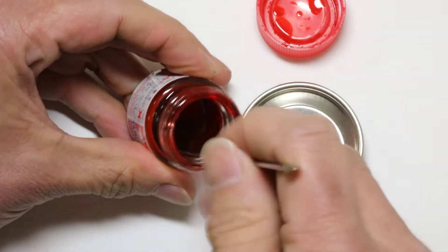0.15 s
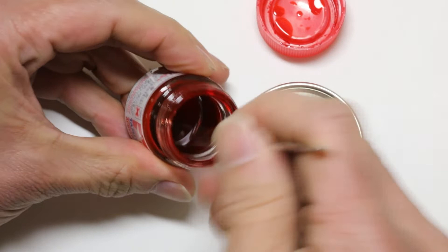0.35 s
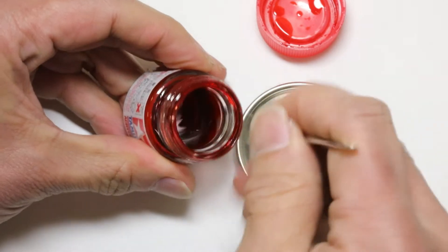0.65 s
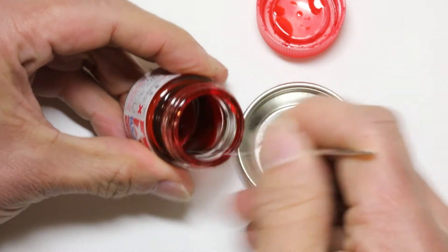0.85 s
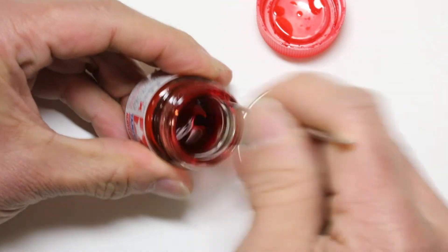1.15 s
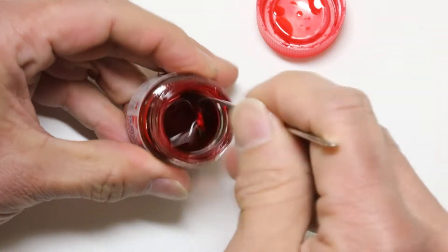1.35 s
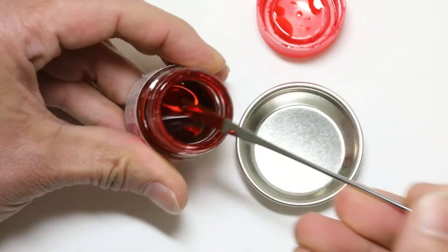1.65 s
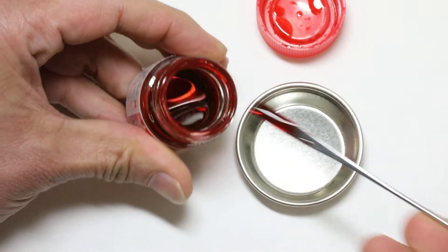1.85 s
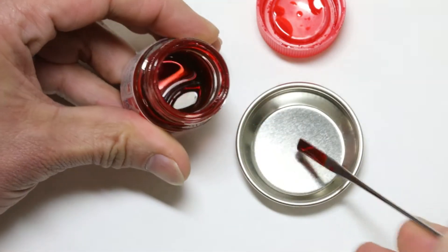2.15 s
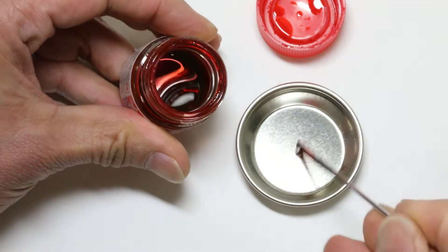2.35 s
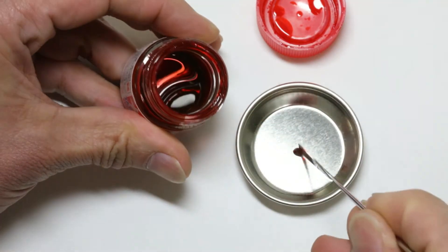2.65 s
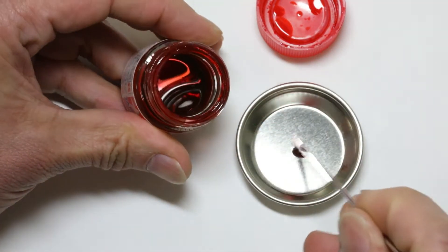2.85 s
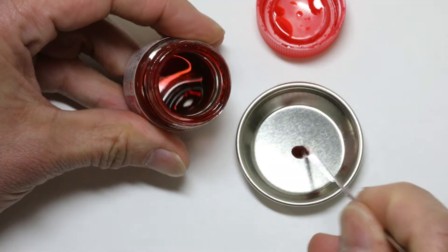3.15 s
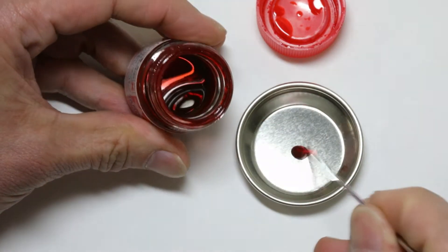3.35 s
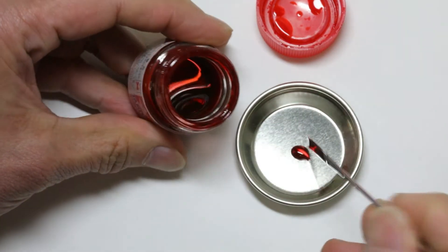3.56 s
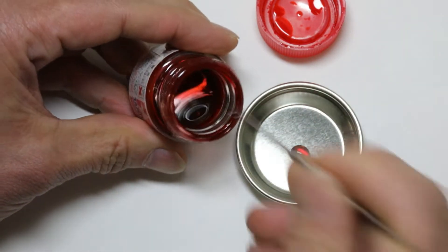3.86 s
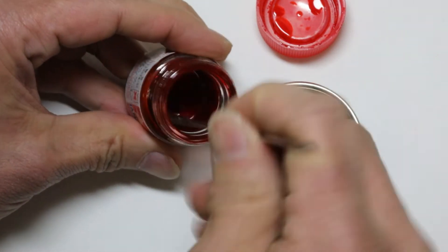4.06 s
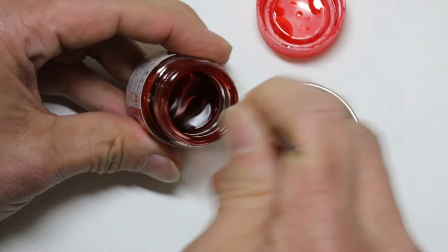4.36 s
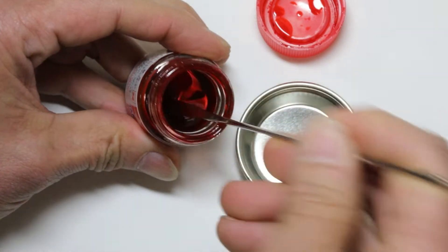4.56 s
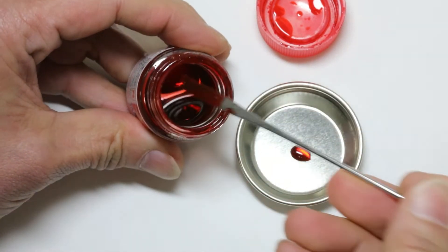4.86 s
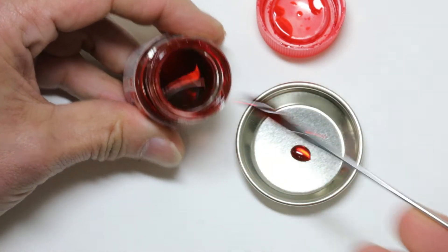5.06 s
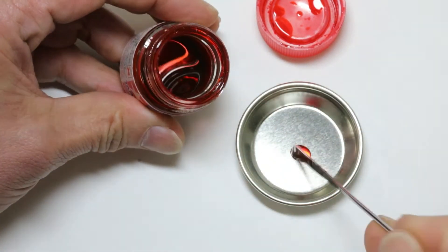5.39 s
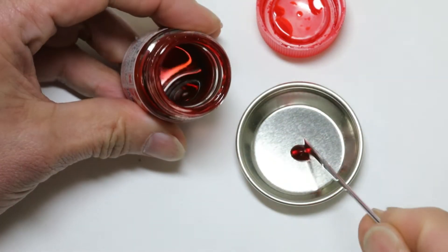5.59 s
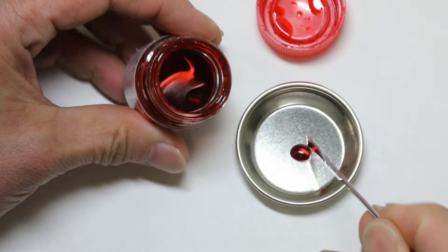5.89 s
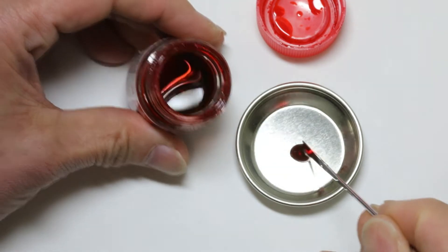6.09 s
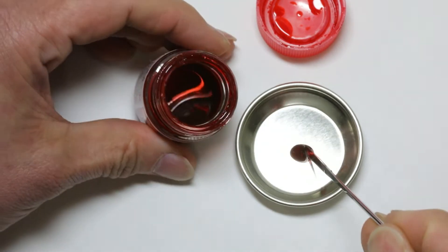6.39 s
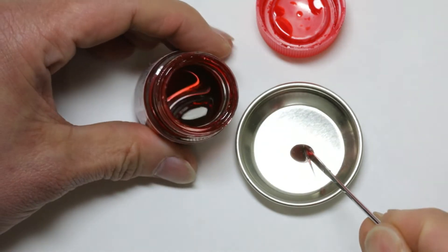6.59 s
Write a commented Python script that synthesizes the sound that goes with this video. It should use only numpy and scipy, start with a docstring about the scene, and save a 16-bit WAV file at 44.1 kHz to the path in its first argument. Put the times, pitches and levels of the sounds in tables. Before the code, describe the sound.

From the start until about 1.7 seconds, a thin metal rod stirs paint in a small hand-held glass jar. It makes light, irregular, damped ticks against the glass and soft scrapes on the bottom, over a very faint table rumble. After a short pause, from about 2.3 to 3.5 seconds, the rod taps a shallow metal dish about eight times, roughly six taps a second. These clinks are bright, clearly louder than the stirring, and ring only briefly. From 4.0 to 4.7 seconds the rod ticks and scrapes in the jar again. Between 5.4 and 6.2 seconds come about five more taps on the dish, with a faint hiss as the wet tip slides over the metal near the end. The sound is close and nearly mono, at a worktable in a small room with a low steady rush throughout.

```python
"""A worktable in a small room with a low steady rush; close, nearly mono microphone.
A thin metal rod stirs paint in a small hand-held glass jar: it ticks against the wall, ringing the
damped glass, and scrapes the bottom. It then taps drops off into a shallow metal dish, where rod
and dish ring together briefly. It stirs again and taps again."""
import sys
import numpy as np
from scipy import signal
from scipy.fft import rfft, irfft
from scipy.io import wavfile

SR = 44100
rng = np.random.default_rng(int(sys.argv[2]) if len(sys.argv) > 2 else 0)


def inscribe(sig):
    """Save sig as 16-bit PCM at rate SR to the path in sys.argv[1].

    A 1-D sig is mono; a 2-D sig holds one channel per row.
    Samples are clipped to [-1, 1] before scaling.
    """
    pcm = np.round(np.clip(np.atleast_2d(sig).T, -1, 1) * 32767)
    wavfile.write(sys.argv[1], SR, pcm.astype(np.int16))


N = 296793
TIME = np.arange(N) / SR
FREQ = np.arange(N // 2 + 1) * SR / N

# jar, damped by hand and paint: (frequency [Hz], level [dB], t60 [s])
JAR_MODES = [(440, -23, 0.032), (1515, 1.5, 0.0039), (1864, 5, 0.028), (2303, 0, 0.0073), (2377, 1.5, 0.01),
             (2886, -10.5, 0.02), (3070, -8, 0.0071), (3734, -15, 0.029), (4170, -11, 0.013),
             (4740, -16, 0.025), (5110, -13, 0.013), (5520, -12, 0.012), (6680, -1.5, 0.0047),
             (7000, -3, 0.0076), (7620, -5, 0.015), (7920, -7.5, 0.0091), (8800, -9, 0.0084),
             (11400, -4.5, 0.013), (12380, -5, 0.012), (13000, -5.5, 0.023), (15200, -15, 0.0068)]
# spells of stirring: (start [s], end [s], table rumble [dB], jar air ring [dB], graze rate [1/s])
STIRS = [(0, 1.68, -63.5, -8, 6), (4.08, 4.7, -63, -3, 4.1)]


def jar_ticks(grate_db=0.5, grate_s=0.004, detune=0.008, share_spread_db=1.5):
    """Each tick meets the wall at another spot, so the modes share it differently; the tip grates."""
    # (time [s], level [dB], hardness [0 = tip cushioned by paint, 1 = bare shaft on the rim])
    ticks = [(.029,-35.5,0.44), (0.0544,-44.5,.75), (0.1298,-35,0.97), (0.1397,-32.5,0.13),
             (.2108,-33,0.18), (.3082,-37.5,1), (0.3185,-33,0.14), (0.3895,-30,0.24), (0.408,-40,.62),
             (0.4787,-45.5,0.97), (.502,-25,0.083), (.5753,-36.5,.08), (.667,-35,0.67), (.7703,-36.5,0.22),
             (0.8436,-35.5,0.91), (0.8499,-32.5,.27), (.9478,-33.5,0.31), (1.0322,-40,.52),
             (1.064,-44,0.48), (1.1502,-39,0.39), (1.236,-45.5,0.87), (1.2503,-33.5,0.19),
             (1.3412,-38.5,0.15), (1.428,-45.5,.66), (1.5694,-31,0.78), (1.583,-37,.6), (1.638,-45,.72),
             (4.0401,-34,0.52), (4.1795,-28.5,0.21), (4.2068,-41.5,0.73), (4.2348,-37.5,0.51),
             (4.3798,-39,.97), (4.443,-33,0.37), (4.5682,-36.5,0.32)]
    out = np.zeros(N)
    hz, db, t60 = np.transpose(JAR_MODES)
    spot_weight = np.minimum(hz / 6000, 1) ** 2  # the low air ring hardly depends on the spot
    for start_s, level_db, hardness in ticks + grazes():
        share, shift = rng.standard_normal((2, len(hz))) * spot_weight
        tick = ring(hz * (1 + detune * shift), db + share_spread_db * share, t60)
        grate = undb(grate_db) * noise_burst(len(tick), grate_s)
        _, _, _, stir_air_db, _ = min(STIRS, key=lambda stir: abs(start_s - stir[0]))
        # harder contact: more glass, less air
        air_db = stir_air_db + 3.5 - 3 * hardness
        glass_db = -11.5 + 21 * hardness
        top_db = -22 + 30 * hardness
        outline = [(1000, air_db - 0.5), (1450, air_db), (1950, air_db), (2400, 0), (5000, 0),
                   (6100, glass_db), (8200, glass_db), (9200, (glass_db + top_db) / 2 - 4.5),
                   (11000, top_db), (13400, top_db), (14400, top_db - 9)]
        add(out, start_s, undb(level_db) * contact(tick + grate, outline))
    return out


def grazes(level_db=-49.5, spread_db=5, hardness=0.62, max_per_stir=24):
    """The shaft brushes the rim by chance: rows of (time [s], level [dB], hardness [0-1])."""
    rows = []
    for start_s, end_s, _, _, per_s in STIRS:
        jitter, strength = rng.random((max_per_stir, 2)).T
        times_s = start_s + (np.arange(max_per_stir) + jitter) / per_s
        levels_db = level_db + spread_db * (strength - 0.5)
        rows += [(s, db, hardness) for s, db in zip(times_s, levels_db) if s < end_s]
    return rows


def dish_taps(crack_db=-32, crack_s=0.006, detune=0.015, force_floor_db=-4.5):
    """The dish lies on the table and dies fast; the rod's own pitch shifts with grip and angle."""
    # (time [s], level [dB], first rod bending mode [Hz], second [Hz])
    taps = [(2.335, -2, 2880, 7980), (2.4215, -17.5, 2800, 8150), (2.5258, 1.5, 2880, 7980),
            (2.7023, 0, 2800, 7650), (2.8684, 1.5, 3000, 8560), (3.0252, 2, 2890, 8240),
            (3.192, 0, 2800, 7500), (3.3492, 0, 2780, 7450), (3.4950, -.5, 2306, 6780),
            (5.424, -7.5, 2870, 7760), (5.5850, -3, 2800, 7900), (5.7160, -2, 2920, 8100),
            (5.8331, -0.5, 2850, 8280), (5.885, -19, 3140, 8000), (6.146, -1, 2800, 7400),
            (6.3865, -35.5, 2900, 7300)]
    # dish and rod together: (frequency [Hz], level [dB], t60 [s])
    modes = [(343, -41.5, 0.05), (488, -30, 0.021), (665, -29, 0.0067), (866, -33.5, 0.02),
             (1226, -32, 0.0084), (2288, -25, 0.013), (2833, -15.5, 0.016), (3245, -35.5, 0.03),
             (3870, -13.5, 0.0071), (4477, -6, 0.0066), (4568, -23.5, 0.049), (4638, -17.5, 0.018),
             (4760, -31, 0.03), (4937, -31, 0.04), (5066, -15.5, 0.011), (5820, -5.5, 0.0029),
             (6430, -3.5, 0.0011), (7647, -18, 0.015), (8050, -66, 0.017), (11620, -33, 0.014),
             (15400, -61, 0.012)]
    lower, upper = 6, 17  # rows of the rod's bending modes
    out = np.zeros(N)
    hz, db, t60 = np.transpose(modes)
    for start_s, level_db, *rod_hz in taps:
        # the highest modes depend most on where the tip lands
        tap_hz = hz * (1 + detune * (hz / 11000) ** 2 * rng.standard_normal(len(hz)))
        tap_hz[[lower, upper]] = rod_hz
        # a longer free end rings lower and louder, knocks harder and lands further off centre
        pitch_ratio = hz[upper] / tap_hz[upper]
        drop_oct = np.log2(pitch_ratio)
        tap_db = db.copy()
        tap_db[upper] += 44 * np.log(pitch_ratio)
        tap = ring(tap_hz, tap_db, t60)
        crack = undb(crack_db) * noise_burst(len(tap), crack_s)
        force_db = max(level_db, force_floor_db)  # a light tap hardly drives the table or bends the rod
        knock_db = -1 + 32.5 * drop_oct + 1.77 * force_db
        rod_db = 19 * drop_oct + 0.7 * force_db
        centre_db = -1.4 - 24 * drop_oct  # a central tap favours the lower main dish mode
        treble_db = -3 + 23 * drop_oct
        outline = [(1200, knock_db), (2200, rod_db), (3200, rod_db),
                   (3750, centre_db), (4250, centre_db), (4750, -centre_db / 2),
                   (6200, treble_db), (11500, treble_db), (14000, treble_db - 11)]
        add(out, start_s, undb(level_db) * contact(tap + crack, outline))
    return out


def rod_pings():
    """The rod catches an edge and sings briefly on one mode."""
    # (time [s], frequency [Hz], level [dB], t60 [s])
    pings = [(2.58, 4120, -30, 0.027), (4.1806, 6550, -23, 0.023), (4.3811, 6470, -23, 0.0076)]
    out = np.zeros(N)
    for start_s, *mode in pings:
        add(out, start_s, ring(*np.transpose([mode])))
    return out


def jar_scrapes():
    """The tip drags through the paint and its slips ring the jar softly."""
    # (middle [s], half length [s], level [dB], treble [dB])
    scrapes = [(0.078, 0.091, -57, -12), (0.456, 0.035, -52, 1), (0.757, 0.04, -54, 0),
               (0.917, 0.029, -49.5, -4), (1.009, 0.031, -47, -1.5), (1.21, 0.032, -48.5, 1.5),
               (1.412, 0.035, -51, 1), (1.599, 0.078, -50.5, 1), (4.166, 0.017, -46.5, -15),
               (4.188, 0.077, -45, -11), (5.18, 0.091, -66, 2)]
    jar_gain = np.abs(rfft(ring(*np.transpose(JAR_MODES)), N))
    tip_gain = colour([(1000, 8.5), (1900, -15), (2600, 4), (8000, -1), (10000, -10)])
    slips = unit(shape(friction(grain_db=5.5), jar_gain * tip_gain))
    treble = shape(slips, np.clip((FREQ - 4000) / 2000, 0, 1))
    return sum(undb(db) * stroke(middle_s, half_s) * (slips + (undb(treble_db) - 1) * treble)
               for middle_s, half_s, db, treble_db in scrapes)


def dish_wipes():
    """The wet tip slides over the metal with a faint hiss."""
    # (middle [s], half length [s], level [dB])
    wipes = [(2.414, .022, -52), (3.458, 0.0067, -59), (5.92, .05, -53.5), (6.019, 0.077, -54),
             (6.106, 0.081, -55)]
    # (frequency [Hz], level [dB])
    hiss_spectrum = [(1500, -16), (3000, -1), (4500, -2), (6500, 1.5), (8000, 0), (10000, -12),
                     (16000, -20)]
    hiss = unit(shape(friction(grain_db=3), colour(hiss_spectrum)))
    return hiss * sum(undb(db) * stroke(middle_s, half_s) for middle_s, half_s, db in wipes)


def room(x, tail_db=-16, t60_s=0.32, onset_s=0.0023, side_db=-17):
    """A few near reflections, then a short, slightly wide diffuse tail."""
    # off table, jar and hands: (delay [ms], gain [linear])
    echoes = [(.488, 0.083), (.718, -0.05), (2.366, -0.17), (4.46, 0.16), (14.3, 0.11)]
    # (frequency [Hz], gain [dB])
    tail_spectrum = [(100, -19), (500, 15.5), (3000, 1.5), (5000, -1.5), (9000, 1), (16000, 0)]
    near = shape(x, 1 + sum(gain * np.exp(-2j * np.pi * FREQ * ms / 1000) for ms, gain in echoes))
    decay = np.exp(-np.log(1000) * TIME / t60_s) * np.clip(TIME / onset_s - 1, 0, 1)
    tails = rng.standard_normal((2, N)) * decay / np.sqrt(np.sum(decay ** 2))
    mid, side = (undb(tail_db) * shape(x, rfft(tail) * colour(tail_spectrum)) for tail in tails)
    return near + mid + undb(side_db) * np.array([side, -side])


def table_rumble(centre_hz=66, half_width_hz=18, fade_s=0.12, rest_db=-86):
    """The table rumbles while the hand stirs and dies down as it comes to rest."""
    band = 1 / (1 + ((FREQ - centre_hz) / half_width_hz) ** 2)
    rumble = unit(shape(rng.standard_normal(N), band))
    envelope = np.full(N, undb(rest_db))
    for start_s, end_s, db, _, _ in STIRS:
        inside_s = np.minimum(TIME - start_s, end_s - TIME)
        envelope += undb(db) * np.clip(inside_s / fade_s + 1, 0, 1) ** 2
    return rumble * envelope


def room_rush(mid_db=-52.5):
    """Steady low rush with room resonances and microphone hiss."""
    # (frequency [Hz], level [dB])
    rush_spectrum = [(15, -60), (25, -19.5), (48, -13.5), (123, -2.5), (200, -4), (301, -5), (335, -3.5),
                     (373, -5.5), (476, -7), (659, -11.5), (1190, -14.5), (1520, -17.5), (5280, -24),
                     (14400, -26.5), (16000, -28.5)]
    # (frequency [Hz], width [Hz], boost [dB])
    resonances = [(183, 19.4, 6.5), (346, 81, 4.5), (468.6, 18.4, 8), (817, 41, 3), (1201, 48, 6)]
    # (frequency [Hz], side minus mid [dB])
    side_spectrum = [(60, -11.5), (110, -15.5), (200, -23), (380, -23.5), (700, -14), (1290, -12),
                     (2380, -7.5), (4400, -3.5), (8120, -1.5), (15000, 0)]
    boost_db = sum(db / (1 + (2 * (FREQ - hz) / width_hz) ** 2) for hz, width_hz, db in resonances)
    gain = colour(rush_spectrum) * undb(boost_db)
    mid = shape(rng.standard_normal(N), gain)
    side = shape(rng.standard_normal(N), gain * colour(side_spectrum))
    return undb(mid_db) * (mid + np.array([side, -side])) / np.std(mid)


def ring(hz, db, t60_s, size=4096):
    """Struck modes; neighbours swing in opposite directions."""
    t = TIME[:size]
    swing = undb(db) * (-1) ** np.arange(len(hz))
    decay = np.exp(-np.log(1000) * t / t60_s[:, None])
    return swing @ (decay * np.sin(2 * np.pi * hz[:, None] * t))


def noise_burst(size, decay_s):
    """Exponentially decaying white noise."""
    return rng.standard_normal(size) * np.exp(-TIME[:size] / decay_s)


def contact(x, outline, size=8192):
    """Minimum-phase colouring of one blow: where and how hard the tip lands."""
    cepstrum = irfft(np.log(colour(outline, np.arange(size // 2 + 1) * SR / size)))
    cepstrum[1:size // 2] *= 2
    cepstrum[size // 2 + 1:] = 0
    return irfft(rfft(x, size) * np.exp(rfft(cepstrum)))[:len(x)]


def stroke(middle_s, half_s):
    """Pressure of one sliding stroke, swelling and fading."""
    return np.cos(np.pi / 2 * np.clip((TIME - middle_s) / half_s, -1, 1)) ** 4


def friction(grain_db):
    """Dense tiny slips of uneven size."""
    return rng.standard_normal(N) * undb(grain_db * np.minimum(rng.exponential(size=N), 6))


def colour(outline, hz=FREQ):
    """Gain at hz of an outline of (frequency [Hz], level [dB])."""
    outline_hz, db = np.transpose(outline)
    return undb(np.interp(np.log(hz + 1), np.log(outline_hz), db))


def shape(x, gain):
    """Filter by a response given on FREQ."""
    return irfft(rfft(x, N) * gain, N)


def add(out, start_s, x):
    """Mix x into out from start_s on."""
    i = max(int(round(start_s * SR)), 0)
    out[i:i + len(x)] += x[:max(N - i, 0)]


def undb(db):
    """Decibels to gain."""
    return 10 ** (np.asarray(db) / 20)


def unit(x):
    """Scale to rms 1."""
    return x / np.sqrt(np.mean(x ** 2))


def scene():
    """Rod, jar and dish in the room, over rush and rumble."""
    contacts = jar_ticks() + rod_pings() + jar_scrapes() + dish_taps() + dish_wipes()
    return room(contacts) + room_rush() + table_rumble()


def record(dry, low_cut_hz=46, top_hz=16000):
    """The microphone thins the deepest bass and the recorder cuts the top."""
    thin = signal.sosfilt(signal.butter(2, low_cut_hz, "high", fs=SR, output="sos"), dry)
    return signal.sosfilt(signal.ellip(10, .1, 70, top_hz, fs=SR, output="sos"), thin)


dry = scene()
out = record(dry)
inscribe(out)
```